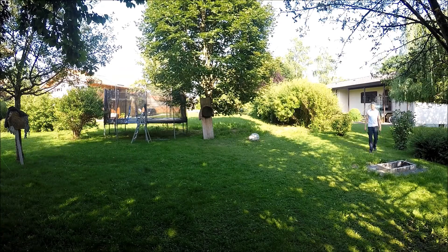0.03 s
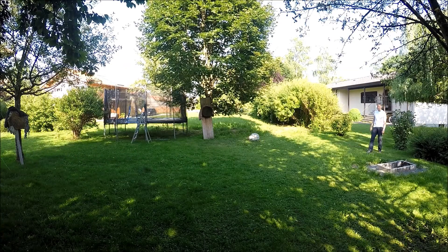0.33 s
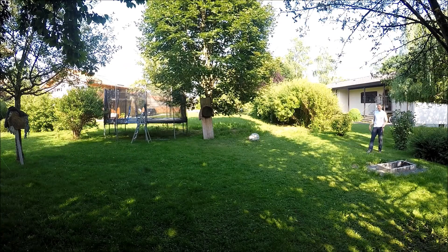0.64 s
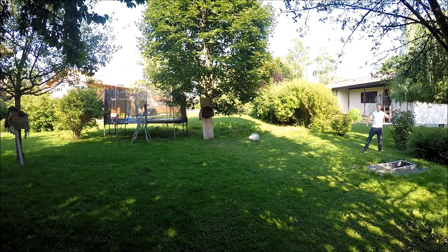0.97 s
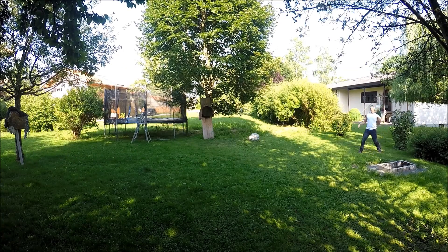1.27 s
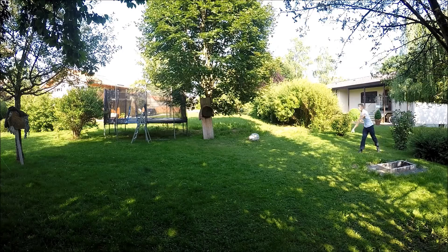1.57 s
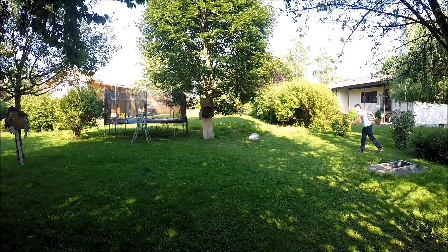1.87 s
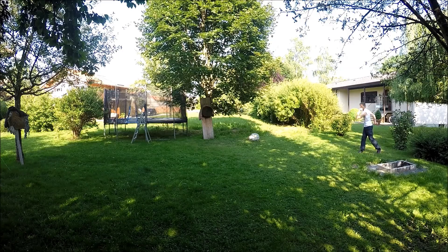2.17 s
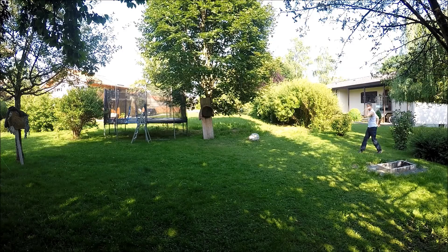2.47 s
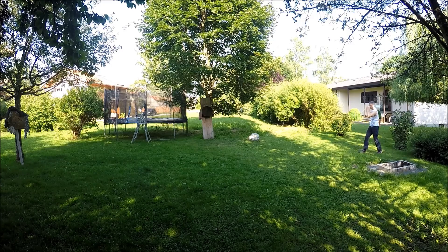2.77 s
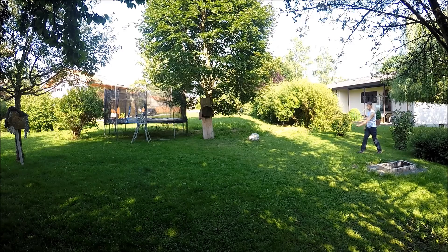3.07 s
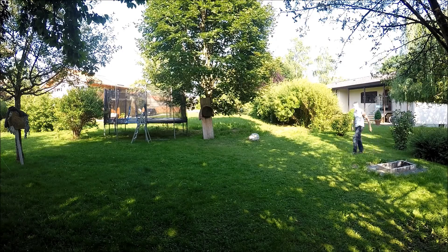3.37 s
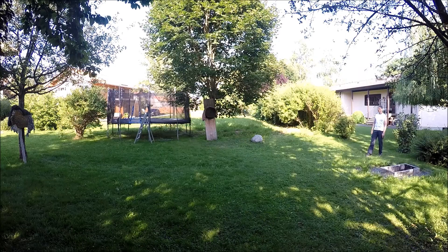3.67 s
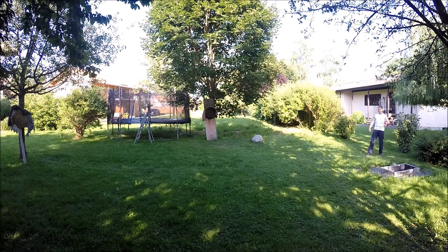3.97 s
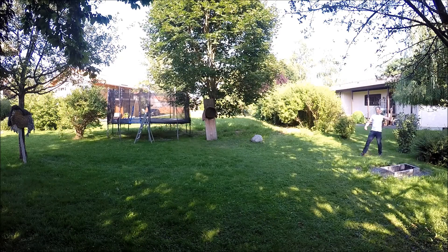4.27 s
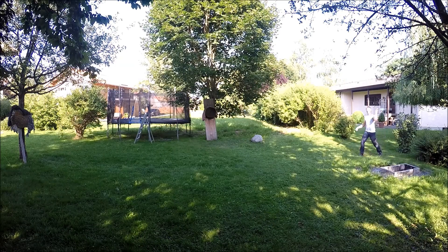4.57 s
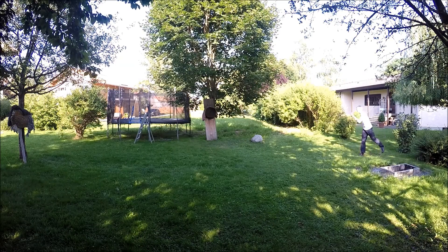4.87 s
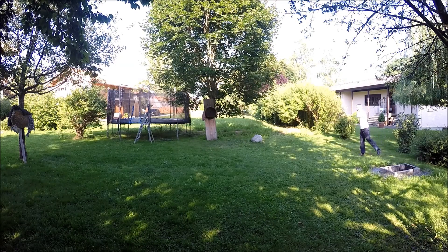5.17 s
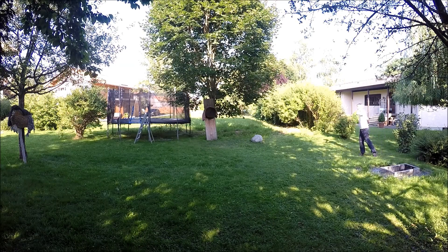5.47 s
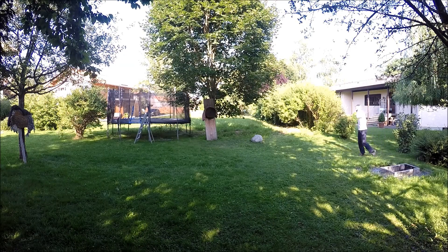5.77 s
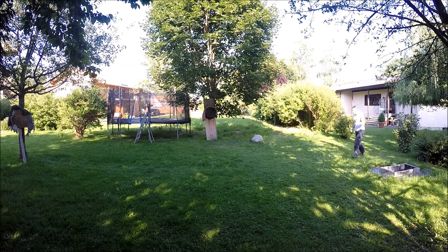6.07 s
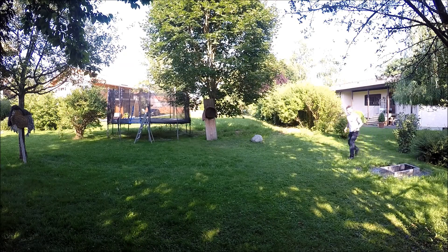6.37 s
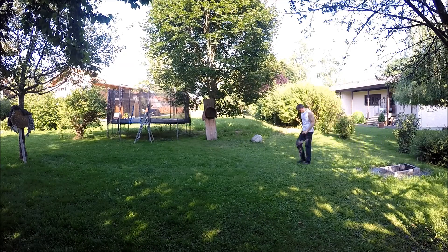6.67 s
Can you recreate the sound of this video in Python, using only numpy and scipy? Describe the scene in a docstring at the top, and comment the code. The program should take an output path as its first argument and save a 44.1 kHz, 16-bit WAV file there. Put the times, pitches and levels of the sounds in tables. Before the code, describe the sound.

Two knives strike a wooden target about three seconds apart, heard from across a backyard. Each lands with a small tick and a short, sharp thud that walls and trees throw back. Behind them are a low throb of far engines, traffic rumble, soft leaf hiss and thin bird chirps. The sound cuts out for an instant between the throws, and a faint double knock precedes the second.

```python
"""Two far engines throb over distant traffic and leaf hiss, and small birds chirp in a back garden.
Far across the garden from the microphone, two knives are thrown into a wooden target on a tree.
Each blade bites with a tick and stops with a thud, which house walls and trees throw back.
A gust passes around the first throw; two faint knocks come before the second.
The sound comes in two stretches, cut to silence between."""
import sys
import numpy as np
from scipy import signal
from scipy.fft import rfft, irfft, next_fast_len
from scipy.io import wavfile
from scipy.ndimage import map_coordinates

SR = 44100
rng = np.random.default_rng(int(sys.argv[2]) if len(sys.argv) > 2 else 0)


def store_wav(level_fs):
    """Save 16-bit WAV to argv[1]."""
    pcm = np.round(np.clip(np.atleast_2d(level_fs), -1, 1) * 32767)
    wavfile.write(sys.argv[1], SR, pcm.T.astype(np.int16))


N = 300762
TIME = np.arange(N) / SR


def amp(db):
    """Decibels to gain."""
    return 10 ** (np.asarray(db) / 20)


def unit(x):
    """Scale to rms 1."""
    return x / np.sqrt(np.mean(x ** 2) + 1e-20)


def along(points, hz):
    """Read (f/Hz, value) points on a log axis."""
    f, v = np.transpose(points)
    return np.interp(np.log(hz + 1), np.log(f + 1), v)


def curves(table):
    """One value per sample for each column after the time."""
    s, *columns = np.vstack(table).T
    return [np.interp(TIME, s, column) for column in columns]


def wobble(knots_per_s):
    """A smooth random curve."""
    return map_coordinates(rng.standard_normal(400), [TIME * knots_per_s], mode="wrap")


def filtered(x, gain):
    """x times a gain that depends on frequency."""
    m = next_fast_len(len(x) + 8192)
    return irfft(rfft(x, m) * gain(np.fft.rfftfreq(m, 1 / SR)), m)[:len(x)]


def noise(spectrum, n=N):
    """Coloured noise of rms 1."""
    return unit(filtered(rng.standard_normal(n), lambda hz: amp(along(spectrum, hz))))


def band(x, low_hz, high_hz):
    """Causal band-pass."""
    return signal.sosfilt(signal.butter(2, [low_hz, high_hz], "band", fs=SR, output="sos"), x)


def band_noise(low_hz, high_hz, n=N):
    """A band of noise of rms 1."""
    return unit(band(rng.standard_normal(n), low_hz, high_hz))


def fade(t, t60):
    """Exponential decay by 60 dB in t60."""
    return np.exp(-np.log(1000) * t / t60)


def rise(t, tau):
    """Onset from 0 to 1 with time constant tau."""
    return 1 - np.exp(-t / tau)


def add(track, s, x):
    """Mix x into the track at time s."""
    part = track[max(round(s * SR), 0):][:len(x)]
    part += x[:len(part)]


def scatter(x, decay, build_s):
    """The diffuse answer of leaves and trunks builds up, then dies as decay (f/Hz, t60/s) sets."""
    hz, t, bins = signal.stft(rng.standard_normal(SR), SR, nperseg=256)
    bins = bins * fade(t, along(decay, hz)[:, None]) * rise(t, build_s)
    tail = signal.istft(bins, SR, nperseg=256)[1]
    return signal.fftconvolve(x, tail / np.linalg.norm(tail))[:N]


# Distant roads, one list per stretch: t/s, rumble level/dB, traffic level/dB (both before trim)
ROAD_LEVELS = [
    [(0.62, -53, -66.5), (1.49, -53.5, -67), (2.61, -53, -64), (2.86, -51.5, -63.5), (3.22, -52, -61.5)],
    [(3.72, -58.5, -67), (4.06, -57, -67.5), (5.46, -54, -65), (5.72, -56, -64), (6.3, -56, -65)],
]
# Their spectra at the microphone: f/Hz, relative density/dB
RUMBLE_SPECTRUM = [(12, -18), (22, -2.5), (38, 2.5), (55, 0), (72, -3.5), (90, -7), (110, -9.5),
                   (135, -13.5), (190, -21.5), (240, -18), (290, -26), (400, -32), (800, -65.5)]
TRAFFIC_SPECTRUM = [(150, -26.5), (300, 0.5), (600, 0), (800, -2), (1000, -5.5), (1250, -5.5), (1700, -11),
                    (2500, -18), (4000, -20.5), (7000, -47)]
# Tyre whir: t/s, level/dB
TYRE_LEVELS = [(3.4, -86.5), (3.55, -73), (4.5, -70.5), (4.95, -68.5), (5.4, -71), (6.6, -69)]
def roads(rumble_trim_db=6.5, traffic_trim_db=1.0):
    """Distant roads reach the garden as a low rumble, a wash of traffic and a narrow tyre whir."""
    rumble_db, traffic_db = curves(ROAD_LEVELS)
    rumble = amp(rumble_db + rumble_trim_db + 1.1 * wobble(8)) * noise(RUMBLE_SPECTRUM)
    traffic = amp(traffic_db + traffic_trim_db + .5 * wobble(7.4)) * noise(TRAFFIC_SPECTRUM)
    tyres = amp(curves(TYRE_LEVELS)[0] + 1.4 * wobble(9)) * band_noise(850, 1100)
    return rumble + traffic + tyres


def engine(hz, db, octave_db):
    """A low firing tone with a weak octave; both waver on their way through the air."""
    phase = 2 * np.pi * np.cumsum(hz) / SR
    octave = amp(octave_db + 2.8 * wobble(7)) * np.sin(2 * phase + .6 * wobble(6))
    return amp(db + .98 * wobble(7)) * np.sin(phase) + octave


# Far engine at one speed: t/s, fundamental level/dB, octave level/dB
STEADY_LEVELS = [(.45, -45.5, -66), (.75, -40, -65), (1.17, -34, -57), (1.6, -42.5, -55.5),
                 (2.2, -39, -53.5), (3.0, -50, -54.5), (3.25, -34, -53), (3.4, -42, -52), (3.5, -69.5, -75)]
# Far vehicle that gathers speed, then slows and fades: t/s, firing f/Hz, level/dB
VEHICLE_RUN = [(.4, 40.07, -44), (1.2, 43.38, -40.5), (2.2, 47.63, -49), (2.6, 50.83, -54.5),
               (3.4, 51, -54), (3.52, 43.7, -40.5), (3.9, 38.55, -53), (4.3, 37.77, -49), (4.6, 36, -58)]
def engines(steady_hz=52.23):
    """Two far engines beat against each other, more slowly the closer their speeds."""
    steady = engine(np.full(N, steady_hz), *curves(STEADY_LEVELS))
    hz, db = curves(VEHICLE_RUN)
    return steady + engine(hz, db, octave_db=db - 12)


# Leaves around the garden: f/Hz, relative density/dB
LEAF_SPECTRUM = [(800, -2), (2000, -2), (3400, -3), (5000, -5), (7000, -9), (10000, -12), (13000, -14),
                 (14200, -13), (15500, -19.5)]
def leaves():
    """Leaves hiss faintly and evenly."""
    return amp(-67 + .2 * wobble(3.4)) * noise(LEAF_SPECTRUM)


def whistles(shape, calls, rasp):
    """Bird calls of one shape, each with its own flutter; rasp is its share of the pitch."""
    song = np.zeros(N)
    at, ratio, shape_db = np.transpose(shape)
    for s, length, hz, db, depth in calls:
        n = int(length * SR)
        progress = np.linspace(0, 1, n)
        pitch = hz * np.interp(progress, at, ratio) ** depth * (1 + rasp * wobble(450)[:n])
        level_db = db + np.interp(progress, at, shape_db) + 3.4 * wobble(140)[:n]
        envelope = amp(level_db) * signal.windows.tukey(n, .1)
        add(song, s, envelope * np.sin(2 * np.pi * np.cumsum(pitch) / SR))
    return song


# A falling chirp; an arch that rises, breaks and drops: share of length, pitch ratio, level/dB
CHIRP_CONTOUR = [(0, .96, -10), (.2, 1.01, -4), (.42, 1.04, -1.5), (.58, .92, 0), (.78, .82, -2),
                 (1, .76, -3.5)]
ARCH_CONTOUR = [(0, 1.0, -8.5), (.1, 1.12, -1), (.28, 1.15, -1.5), (.32, 0.81, -6), (.4, .82, -6),
                (.47, 1, -0.5), (.58, .84, -9), (.76, .91, 2.5), (.86, .79, -3.5), (1, .77, 1)]
# Calls in the garden: t/s, length/s, f/Hz, base level/dB, glide depth (chirps only)
CHIRP_CALLS = [(0.38, 0.075, 3575, -57, 0.85), (0.608, .07, 4700, -71, 0.29),
               (0.729, 0.072, 3460, -63.5, 0.62), (1.091, 0.05, 4150, -67.5, .2),
               (1.564, 0.046, 3372, -67, 0.79), (1.698, 0.084, 3640, -66, .9),
               (2.188, 0.08, 3590, -61.5, 0.73), (2.533, 0.052, 3650, -61, .5),
               (2.861, 0.087, 3725, -58.5, 1.2), (3.007, 0.066, 3650, -57, 1.05),
               (3.942, .15, 3830, -62.5, 0.5), (3.959, 0.083, 4680, -70.5, 0.34)]
ARCH_CALLS = [(4.164, .11, 3900, -56.5), (5.273, 0.11, 3905, -58.5), (6.209, 0.1, 4040, -58)]
def birds(house_delay_s=.061, house_db=-15.5):
    """Thin, rasping whistles, blurred by the trees and repeated by the house wall."""
    song = whistles(CHIRP_CONTOUR, CHIRP_CALLS, rasp=.055)
    song += whistles(ARCH_CONTOUR, [(*call, 1) for call in ARCH_CALLS], rasp=.025)
    trees = scatter(song, [(3000, .39), (6000, .46)], build_s=.0028)
    out = amp(-.5) * song + amp(-2.5) * trees
    add(out, house_delay_s, amp(house_db) * song)
    return out


# Wind in the garden trees: t/s, rustle level/dB
GUST_LEVELS = [(2.3, -91), (2.6, -74), (3.0, -69.5), (3.4, -69), (3.5, -85)]
def gust():
    """A passing gust rustles the leaves over a lower whoosh in the trees."""
    rustle = band_noise(1500, 3400)
    whoosh = amp(3.5) * band_noise(480, 700)
    return amp(curves(GUST_LEVELS)[0] + wobble(12)) * (rustle + whoosh)


# Splitting wood fibres: f/Hz, relative density/dB
FIBRE_SPECTRUM = [(300, -9.5), (1200, -3.5), (2500, 2), (4000, -0.5), (8000, -11), (11500, -15.5),
                  (13000, -19.5), (16000, -27.5)]
# Modes of the steel blade: f/Hz, relative level/dB, t60/s
BLADE_MODES = [(3020, -4, .1), (5200, -9, .13), (5303, -0.5, .11), (7600, -7.5, 0.22), (7860, -6.5, .14),
               (10330, -9.5, .15)]
def blade_tick(t, stop_s, bite_db, blade_db, blur_hz=130):
    """The tip splits fibres and rings the blade, whose modes blur as it chatters in the cut."""
    cutting = fade(np.maximum(t - stop_s, 0), .022)  # full while the blade moves
    rustle = .6 * fade(t, .29)
    bite = noise(FIBRE_SPECTRUM, len(t)) * (cutting + rustle) * rise(t, .0002)
    clink = sum(amp(db) * fade(t, t60) * band_noise(hz - blur_hz, hz + blur_hz, len(t))
                for hz, db, t60 in BLADE_MODES)
    return amp(bite_db) * bite + amp(blade_db) * clink


# Modes of the wooden target, before each throw's pitch and tilt: f/Hz, relative level/dB, t60/s
TARGET_MODES = [(312, -10, 0.034), (425, -5, 0.065), (562, -0.5, 0.045), (685, -2.5, 0.057),
                (736, -6.5, 0.056), (935, -14.5, 0.048), (1118, -20, 0.08), (1353, -16.5, 0.05),
                (1506, -21.5, 0.043), (1636, -22, .048), (1847, -31, .06), (2100, -23, 0.021),
                (2590, -33.5, .05)]
def target_ring(t, tilt_db):
    """Neighbouring modes start in opposite directions, so the thud swells and its highs come first."""
    ring = np.zeros(len(t))
    for k, (hz, db, t60) in enumerate(TARGET_MODES):
        gain = (-1) ** k * amp(db + tilt_db * np.log2(hz / 600))
        ring += gain * fade(t, t60) * np.sin(2 * np.pi * hz * t)
    return ring


def trunk_push(t):
    """The trunk takes the blow as one low pulse with no ring."""
    u = (t - .0045) / .003
    return (1 - 1.5 * u * u) * np.exp(-u * u) * rise(t, .0011)


# Returns from trees, fence and house: delay t/s, relative level/dB, low f/Hz, high f/Hz, smear/s
REFLECTORS = [(.03, -9, 168.7, 403, .001), (.055, -15, 799, 1820, 0.0014),
              (0.062, -5.5, 950, 2130, 0.00053), (0.0605, -6.5, 128, 340, 0.0011),
              (.069, -19, 850, 1800, 0.0027), (.072, -12.5, 140, 360, .006), (.114, -17, 920, 1700, .0007),
              (.114, -19.5, 130, 330, .003)]
def echoes(x, roughness=.28):
    """Distinct echoes reach the microphone, each coloured and smeared by an uneven surface."""
    out, t = np.zeros(N), np.arange(SR // 20) / SR
    for delay, db, low_hz, high_hz, smear in REFLECTORS:
        grain = rng.standard_normal(len(t)) * np.exp(-t / smear)
        surface = roughness * grain / np.linalg.norm(grain) + (t == 0)
        add(out, delay, amp(db) * signal.oaconvolve(x, band(surface, low_hz, high_hz)))
    return out


# Decay across the garden: f/Hz, t60/s
GARDEN_DECAY = [(100, 0.46), (500, 0.51), (1200, .8), (4000, 0.2), (10000, 0.075)]
# Hits on the far target: t/s, stopping time/s, thud level/dB, pitch ratio, tilt/(dB per octave),
# push level/dB, bite level/dB, blade level/dB, slap gain/dB, beam f/Hz
KNIFE_HITS = [(2.374, .0043, -19, 1.0, 1, -28, -50, -53.5, 1, 958),
              (5.4774, 0.00273, -21.5, 0.99, 1.1, -22.5, -51.5, -73, 1.5, 1610)]
def knives():
    """Each knife ticks going in and thuds as it stops; the garden throws the sound back."""
    out, t = np.zeros(N), np.arange(SR // 2) / SR
    for s, stop_s, thud_db, pitch, tilt_db, push_db, bite_db, blade_db, slap_db, beam_hz in KNIFE_HITS:
        tick, thud, slap, beam = np.zeros((4, N))
        add(tick, s, blade_tick(t, stop_s, bite_db, blade_db))
        blow = amp(thud_db) * target_ring(t * pitch, tilt_db) + amp(push_db) * trunk_push(t)
        add(thud, s + stop_s, blow)
        # the first few cycles are the slap of the target's face, which carries across the garden
        face = amp(slap_db) * blow / (1 + (t / .0059) ** 4)
        add(slap, s + stop_s, face)
        # the spot that is hit decides which band the face beams at the house
        add(beam, s + stop_s, face + amp(5) * band(face, beam_hz - 130, beam_hz + 130))
        near = scatter(slap, [(200, .18), (600, .091), (1200, .23), (3000, .25)], build_s=.008)
        far = scatter(band(slap, 800, 5000) + tick, GARDEN_DECAY, build_s=.044)
        out += tick + thud + echoes(beam) + amp(-11) * near + amp(-18) * far
    return out


# Knocks beyond the garden: t/s, level/dB
FAR_KNOCKS = [(4.899, -55), (4.938, -56)]
def knocks():
    """Something knocks softly, far from the microphone."""
    out, t = np.zeros(N), np.arange(SR // 4) / SR
    for s, db in FAR_KNOCKS:
        add(out, s, amp(db) * band_noise(724, 1050, len(t)) * fade(t, .12) * rise(t, .0015))
    return out


def scene():
    """The back garden from one microphone, far from the target."""
    events = knives() + birds() + knocks()
    background = engines() + roads() + gust() + leaves()
    return (events + background)[None]


# Stretches with the microphone open: start t/s, end t/s
STRETCHES = [(.401, 3.405), (3.503, 6.609)]
def record(dry, ramp_s=.002, top_hz=15400):
    """Sound passes only within the two stretches, and nothing above the band limit."""
    gate = sum(np.clip(np.minimum(TIME - start, end - TIME) / ramp_s, 0, 1) for start, end in STRETCHES)
    return filtered(dry[0] * gate, lambda hz: hz < top_hz)[None]


dry = scene()
out = record(dry)
store_wav(out)
```